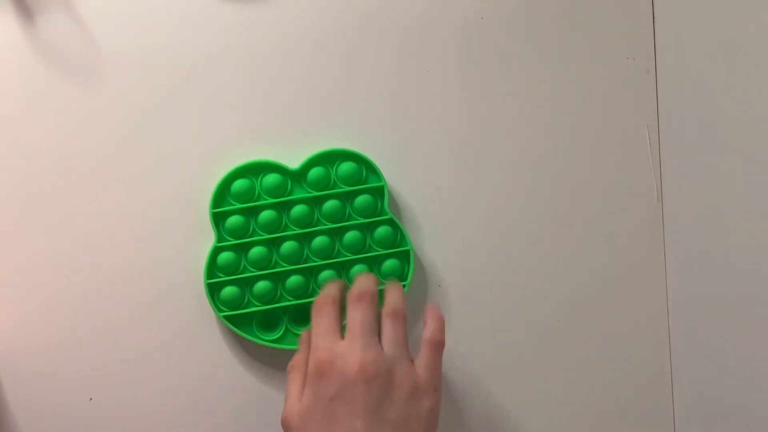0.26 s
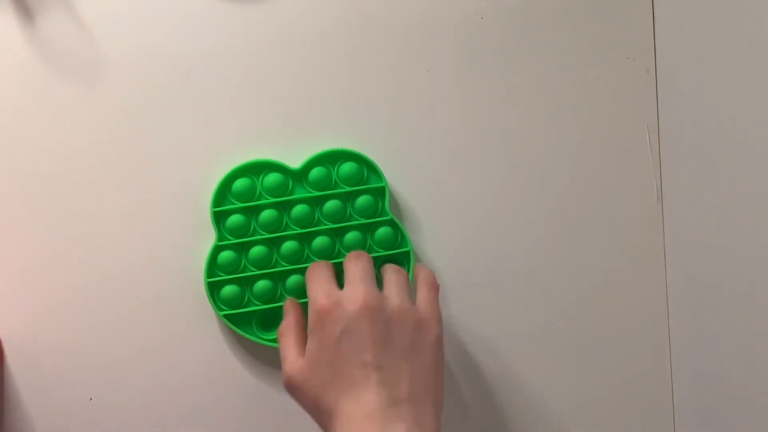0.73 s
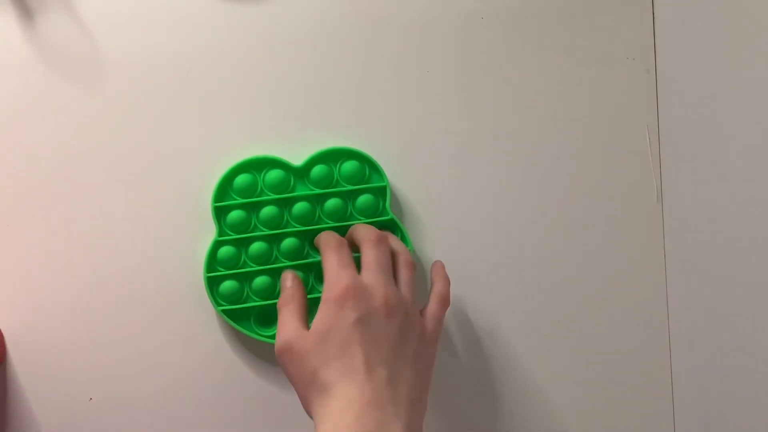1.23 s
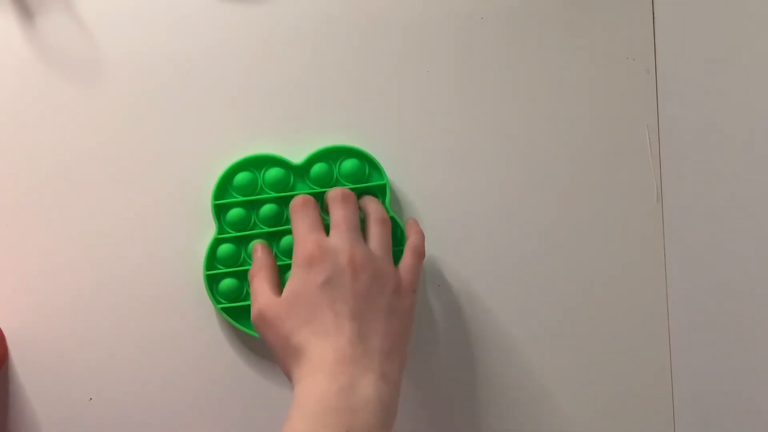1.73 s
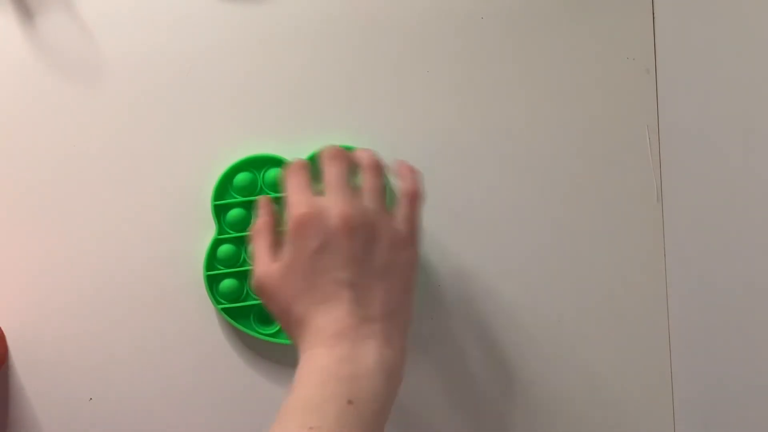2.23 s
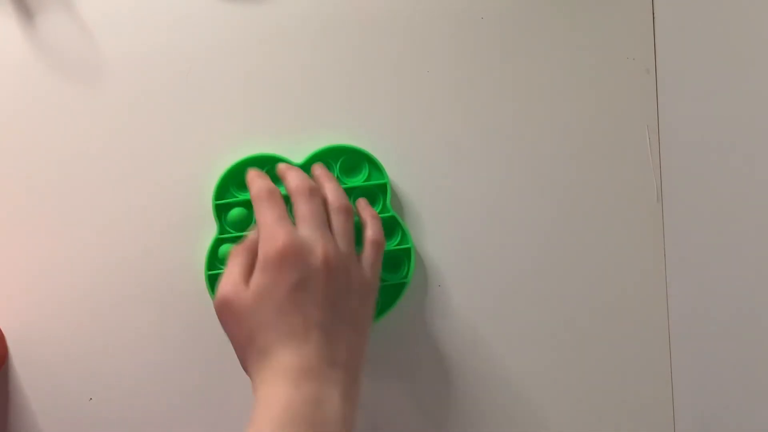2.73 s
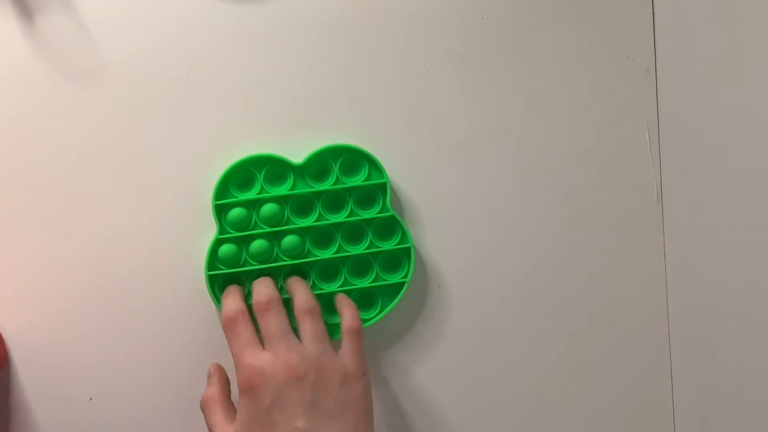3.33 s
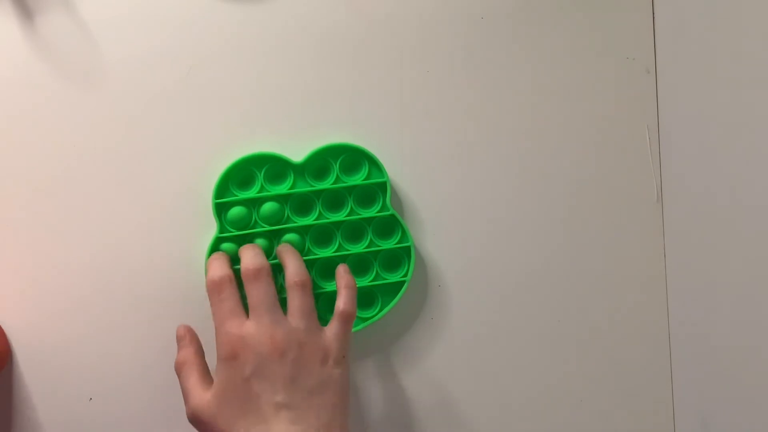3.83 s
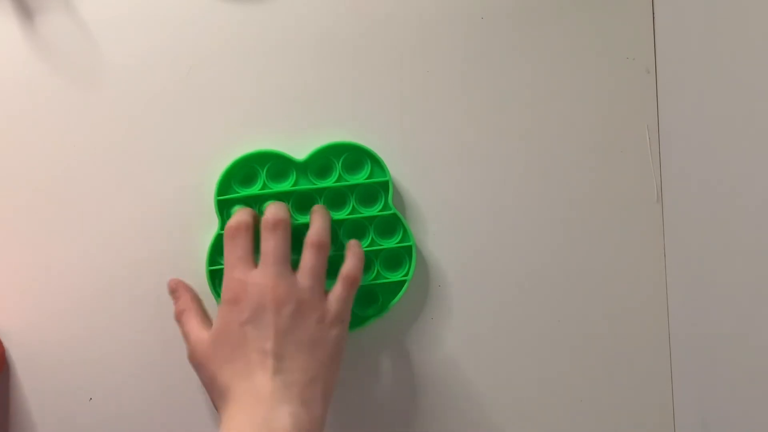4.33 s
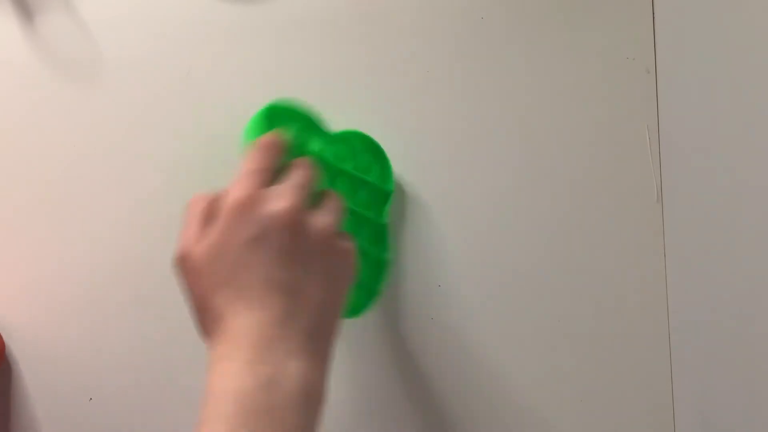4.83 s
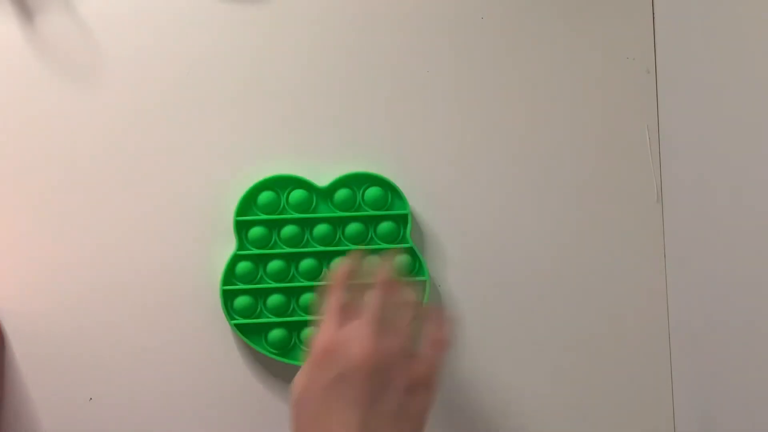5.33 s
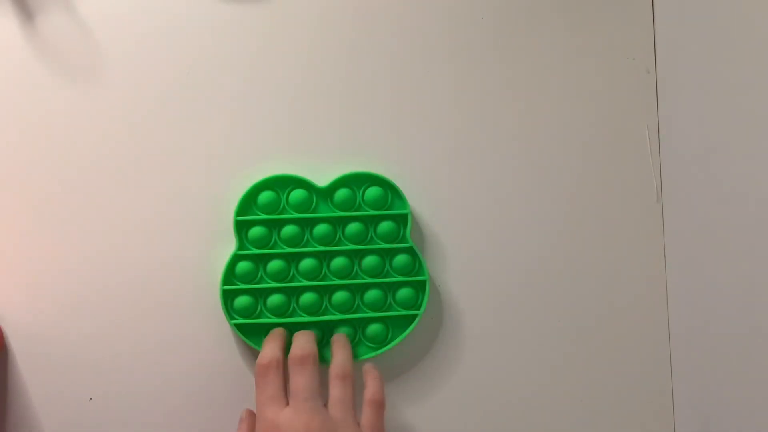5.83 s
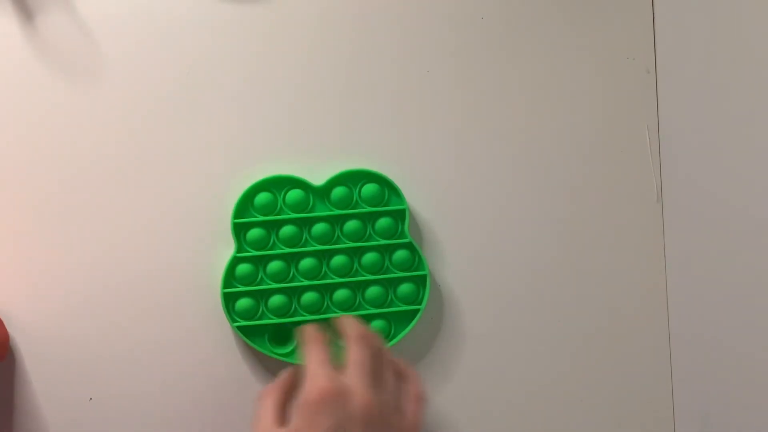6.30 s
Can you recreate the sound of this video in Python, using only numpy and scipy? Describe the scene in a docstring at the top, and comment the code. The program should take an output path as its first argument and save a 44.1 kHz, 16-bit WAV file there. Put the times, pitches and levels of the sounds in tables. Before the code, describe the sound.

Fingers pop the bubbles of a silicone fidget toy on a thin table, each pop a sharp snap with a hollow knock from the board. The first comes at about 0.1 seconds, followed by quick clusters of two or three near 0.6, 1.2, 1.7, 2.1 and 2.6 seconds. After a short gap, tight double pops sound at about 3.4, 4.0 and 4.5 seconds. Soft fingertip taps and faint rubbing of skin on silicone lie between them. Around 4.9 seconds the toy drags across the table with a brief stuttering groan, then lands at about 5.3 seconds with a floppy slap and a short brushing hiss. Only light taps and faint rubs follow, until about 6.5 seconds. The microphone is close above the table in a small quiet room with little echo and a very faint steady background rumble.

```python
"""Sharp pops and hollow knocks: fingers pop the domes of a silicone bubble toy on a thin table top,
then drag it up, flip it and slap it down. Each dome snaps in the air and knocks the board, whose
bending waves arrive treble first, bass last. Skin rubs on silicone between presses.
A small quiet room, a phone microphone above the table."""
import sys
import numpy as np
from scipy import signal
from scipy.fft import rfft, irfft
from scipy.io import wavfile
from scipy.ndimage import uniform_filter1d

SR = 44100
rng = np.random.default_rng(int(sys.argv[2]) if len(sys.argv) > 2 else 0)


def unload_wav(signal):
    """Save mono or channel-first audio to the path in sys.argv[1] as 16-bit WAV at rate SR, clipped to [-1, 1]."""
    wavfile.write(
        sys.argv[1],
        SR,
        np.round(np.clip(np.atleast_2d(signal).T, -1, 1) * 32767).astype(np.int16),
    )


N = 289296

# Domes flipping. Each row: time in seconds, snap in dB, cavity in Hz, air puff in dB,
# board knock in dB, board bass in dB, mode under the dome in Hz.
POPS = [(0.102, -15, 1810, -15.5, -15, -23, 690), (0.239, -31, 1850, -54, -23.5, -33, 730),
        (0.6216, -20, 1850, -57.5, -19.5, -30, 896), (0.633, -14, 1830, -37.5, -18, -14, 895),
        (0.6519, -14, 4870, -12, -14, -23, 713), (1.118, -14.5, 1780, -26, -13, -25, 716),
        (1.172, -15.5, 4120, -13, -10, -22, 650), (1.26, -20, 2210, -25, -15, -17.5, 710),
        (1.6473, -13, 2907, -49.5, -18.5, -34, 396), (1.654, -11, 3680, -40.5, -14.5, -27, 720),
        (1.7032, -12, 3790, -13, -15, -24, 710), (2.121, -18.5, 1595, -31, -25, -16.5, 1150),
        (2.125, -9.5, 1760, -47.5, -15, -19, 270), (2.537, -13, 1490, -23, -19, -21, 1032),
        (2.619, -15, 1430, -29, -22.5, -26, 690), (3.3782, -18.5, 2750, -28, -13.5, -23.5, 700),
        (3.4015, -9, 2120, -30, -13.5, -24, 704), (3.9913, -14.5, 1593, -17.5, -23, -35.5, 1146),
        (3.998, -15, 4880, -21.5, -13.5, -13, 1150), (4.544, -13.5, 2390, -22, -18, -32, 332),
        (4.555, -11.5, 1574, -25.5, -16, -17, 707)]
# Fingers and toy landing. Each row: time in seconds, tick in dB, board knock in dB,
# board bass in dB, mode under the contact in Hz.
TAPS = [(0.05, -74, -47, -42.5, 270), (0.385, -63, -44, -77.5, 910), (0.394, -60, -32.5, -42.5, 700),
        (0.644, -49, -19.5, -23, 710), (0.819, -52, -71, -57.5, 710), (0.969, -54.5, -30, -33, 890),
        (0.977, -62.5, -28.5, -33.5, 330), (0.988, -54, -34.5, -37.5, 400),
        (1.366, -60.5, -46.5, -49.5, 274), (1.542, -43, -25.5, -40, 690), (1.877, -55.5, -70, -65, 294),
        (2.019, -60.5, -35.5, -44, 400), (2.132, -40.5, -14, -10, 270), (2.249, -50.5, -38, -52.5, 740),
        (2.265, -57, -40.5, -70.5, 407), (2.466, -40.5, -23, -37, 690), (2.766, -65.5, -51, -69, 270),
        (2.828, -64.5, -50, -66.5, 320), (3.015, -59.5, -46, -54.5, 392), (3.027, -61, -31, -38, 710),
        (3.176, -72.5, -54, -60, 710), (3.262, -66.5, -28.5, -36.5, 710), (3.565, -74, -51, -57, 270),
        (3.675, -62.5, -28, -41.5, 900), (4.301, -56.5, -34, -32.5, 336), (4.502, -63, -57, -40.5, 340),
        (4.701, -73, -59, -73, 321), (4.805, -51.5, -36, -61, 297), (4.814, -56.5, -43.5, -55, 400),
        (4.863, -56, -28.5, -30.5, 357), (4.983, -54.5, -51, -35, 720), (5.16, -41, -23, -28.5, 299),
        (5.18, -49, -31, -34.5, 270), (5.218, -45.5, -22.5, -23.5, 366), (5.251, -54, -25.5, -29.5, 900),
        (5.259, -28, -18.5, -37.5, 397), (5.27, -19.5, -11.5, -15, 405), (5.288, -24, -16, -23.5, 930),
        (5.306, -28, -16.5, -24, 1500), (5.32, -36, -16.5, -32, 930), (5.544, -69.5, -44.5, -48.5, 410),
        (5.553, -64, -41.5, -44, 400), (5.692, -57, -80, -84, 402), (5.752, -50, -66.5, -71, 1500),
        (6.021, -60, -37.5, -26, 720), (6.042, -63.5, -30.5, -32, 710), (6.053, -65.5, -49, -37, 710),
        (6.325, -47.5, -38.5, -42, 398), (6.488, -56.5, -34.5, -42, 660), (6.525, -68.5, -49, -46, 270)]
# Toy dragged over the board. Each row: time in seconds, board drive in dB, rim chatter in dB.
DRAG = [(4.854, -46.5, -68), (4.864, -22.5, -45), (4.89, -15, -43), (4.962, -29.5, -54.5),
        (5.02, -67, -75.5)]
# Spectra of rub and tick as coloured by the microphone.
# Each row: frequency in Hz, relative density in dB.
RUB_SPECTRUM = [(880, -48), (1500, -12.5), (2060, -15.5), (2390, -5.5), (2770, -19), (3180, -5.5),
                (4330, -7.5), (5170, -12), (5600, -12), (7170, -9), (8300, -3.5), (10000, -9.5),
                (11500, -22), (16000, -37)]
TICK_SPECTRUM = [(1500, -1.5), (2500, -0.5), (4500, -2), (6600, -12.5), (8300, -9.5), (11000, -27.5),
                 (16000, -43)]


def from_db(db):
    return 10 ** (np.asarray(db) / 20)


def at_hz(points, hz):
    """Interpolate (Hz, value) rows over log frequency."""
    points = np.array(points)
    return np.interp(np.log(hz + 1), np.log(points[:, 0]), points[:, 1])


def coloured(spectrum, size):
    """Noise of a given spectrum, rms 1."""
    hz = np.fft.rfftfreq(size, 1 / SR)
    x = irfft(rfft(rng.standard_normal(size)) * from_db(at_hz(spectrum, hz)), size)
    return x / np.std(x)


def burst(spectrum, t60_s, rise_s=.0021):
    """Noise that swells fast and dies."""
    t = np.arange(2048) / SR
    return coloured(spectrum, len(t)) * np.clip(t / rise_s, 0, 1) * from_db(-60 * t / t60_s)


def ring(force, hz, t60_s):
    """One mode: a unit click starts a decaying sine of height 1."""
    r, w = from_db(-60 / (t60_s * SR)), 2 * np.pi * hz / SR
    return signal.lfilter([0, np.sin(w)], [1, -2 * r * np.cos(w), r * r], force + 1e-18)


def butter(x, order, hz, kind="low"):
    return signal.sosfilt(signal.butter(order, hz, kind, fs=SR, output="sos"), x)


def add(out, start_s, sound, peak_db):
    at = round(start_s * SR)
    out[at:at + len(sound)] += (from_db(peak_db) * sound / np.abs(sound).max())[:N - at]


def slips(per_s, spread_db=3):
    """Stick and slip: uneven random clicks, rms 1."""
    clicks = (rng.random(N) < per_s / SR) * rng.choice([-1, 1], N)
    clicks = clicks * from_db(spread_db * rng.standard_normal(N))
    return clicks / np.std(clicks)


def drag_gain(column):
    """Envelope from one dB column of DRAG, silent outside the drag."""
    rows = np.array(DRAG)
    return from_db(np.interp(np.arange(N) / SR, rows[:, 0], rows[:, column], left=-200, right=-200))


def pad_treble_db(knock_db):
    """Treble drive of a finger pad: the softer the landing, the duller."""
    return knock_db - 3 + .38 * np.minimum(knock_db + 20, 0)


def dome_snaps(swell_s=.03, cavity_cycles=16):
    """A dome whips through, rings its cavity and puffs out air; a faint hiss swells just before."""
    # Puff spectrum as coloured by the microphone. Each row: frequency in Hz, relative density in dB.
    puff_spectrum = [(3000, -29.5), (5000, -2.5), (6700, -11.5), (8400, 0.5), (10000, -6), (11500, -20),
                     (16000, -33.5)]
    swell = np.linspace(0, 1, int(swell_s * SR)) ** 2
    out = np.zeros(N)
    for start_s, snap_db, cavity_hz, puff_db, *_ in POPS:
        hiss = swell * coloured(RUB_SPECTRUM, 2048)[:len(swell)]
        add(out, start_s - swell_s, hiss, snap_db - 36.5)
        cavity = ring(burst(TICK_SPECTRUM, t60_s=.008), cavity_hz, t60_s=cavity_cycles / cavity_hz)
        add(out, start_s, cavity, snap_db - 2)
        add(out, start_s, burst(TICK_SPECTRUM, t60_s=.027), snap_db - 3)
        add(out, start_s, burst(puff_spectrum, t60_s=.0058), puff_db)
    return out


def soft_taps(octaves_per_db=.2, tick_share=.67):
    """Fingers and toy land with a tick and a scuff; harder ticks reach higher."""
    # Scuff spectrum. Each row: frequency in Hz, relative density in dB.
    scuff_spectrum = [(600, -9.5), (1200, -3), (1900, 3), (2700, -8.5), (3500, -22.5), (6000, -35),
                      (16000, -53.5)]
    out = np.zeros(N)
    for start_s, tick_db, knock_db, *_ in TAPS:
        edge_hz = min(3480 * 2 ** (octaves_per_db * (tick_db + 60.5)), .45 * SR)
        add(out, start_s, butter(burst(TICK_SPECTRUM, t60_s=.027), 2, edge_hz), tick_db)
        scuff_db = tick_share * tick_db + (1 - tick_share) * pad_treble_db(knock_db) - .5
        add(out, start_s, burst(scuff_spectrum, t60_s=.024), scuff_db)
    return out


def board_knocks(middle_from_hz=220, treble_from_hz=620, pad_contact_hz=2200, pad_db_per_octave=-3.5):
    """Every blow strikes all modes of the table top; the dragged toy makes it groan."""
    # Table top modes. Each row: frequency in Hz, gain in dB, t60 in seconds before the damping cap.
    modes = [(98, -8.5, 0.11), (128.7, 1.5, 0.13), (170, -6.5, 0.11), (270, -0.5, 0.028), (333, -1, 0.24),
             (396.6, -1, 0.1), (516.5, -7, 0.066), (567, -11.5, 0.081), (707, -7.5, 0.099), (771, -6, 0.03),
             (900, -3.5, 0.05), (1012, -7, 0.061), (1150, -6, 0.042), (1336, -8.5, 0.092),
             (1490, -12.5, 0.12), (1677, -11, 0.11), (1850, -13.5, 0.09), (2300, -18.5, 0.075),
             (2840, -23.5, .02)]
    blows = np.array([(row[0], *row[-3:]) for row in POPS + TAPS])
    start_s, knock_db, bass_db, spot_hz = blows.T
    padded = np.arange(len(blows)) >= len(POPS)
    treble_db = np.where(padded, pad_treble_db(knock_db), knock_db - 1)
    # silicone lands in four touches, the first strongest
    later_s = np.cumsum(rng.uniform(.002, .008, (len(blows), 3)), axis=1)
    touch_s = start_s[:, None] + np.insert(later_s, 0, 0, axis=1)
    at = np.round(touch_s * SR).astype(int).clip(0, N - 1)
    touch_db = np.where(padded[:, None], [0, -7, -11, -8], [-.5, -9, -10.5, -13.5])
    scatter_db = rng.normal(0, 2.5, (len(blows), len(modes), 4))
    groan = drag_gain(column=1) * butter(slips(per_s=1600), 2, [270, 430], "band") * from_db(-28)
    out = np.zeros(N)
    for k, (hz, gain_db, t60_s) in enumerate(modes):
        is_bass, is_middle = hz < middle_from_hz, middle_from_hz <= hz < treble_from_hz
        drive_db = bass_db if is_bass else knock_db if is_middle else treble_db
        # lift of the modes that move most under the struck spot
        spot_db = 7.5 * np.exp(-(np.log2(hz / spot_hz) / .14) ** 2)
        dull_db = padded * pad_db_per_octave * max(np.log2(hz / 800), 0)
        blow_db = drive_db + spot_db + dull_db - 3
        strength = from_db(blow_db[:, None] + touch_db + scatter_db[:, k])
        if is_bass:
            strength[:, 1:] = 0   # slow modes feel one push
        force, pad_force = groan * is_middle, np.zeros(N)
        np.add.at(force, at[~padded], strength[~padded])
        np.add.at(pad_force, at[padded], strength[padded])
        force += butter(pad_force + 1e-18, 2, pad_contact_hz)   # a padded landing lasts longer
        # hand and silicone damp the middle modes; elsewhere wood rings 45 cycles at most
        cap_s = .055 if is_middle else 45 / hz
        out += (-1) ** k * from_db(gain_db) * ring(force, hz, min(t60_s, cap_s))
    return bending_waves(out)


def bending_waves(x, lag_at_1khz_s=.003, air_lag_s=.003, contact_hz=3500):
    """Wave speed grows as the root of frequency; timing is relative to the airborne snap."""
    hz = np.fft.rfftfreq(2 * N, 1 / SR)
    phase_turns = 2 * lag_at_1khz_s * np.sqrt(1e3 * hz) - air_lag_s * hz
    contact = 1 / (1 + (hz / contact_hz) ** 4)   # soft contact cuts the treble
    return irfft(rfft(x, 2 * N) * contact * np.exp(-2j * np.pi * phase_turns))[:N]


def skin_rub(fall_db_per_s=501, scrape_hz=10500, grip_db=1.2):
    """Skin hisses over silicone with uneven grip; hard slides gain a bright edge."""
    # Slides. Each row: swell end in seconds, fade start in seconds, level in dB, swell in dB per second.
    slides = [(0.106, 0.074, -93, 893), (0.445, 0.6, -80.5, 450), (0.8, 0.841, -68.5, 298),
              (1.402, 1.402, -66, 501), (1.547, 1.62, -76, 596), (1.875, 1.888, -70.5, 303.5),
              (2.255, 2.254, -66, 900), (2.751, 2.964, -71, 498), (3.018, 3.022, -76, 599.5),
              (3.165, 3.172, -82, 449), (3.47, 3.494, -68.5, 446), (3.52, 3.523, -59.5, 402.5),
              (3.686, 3.752, -71.5, 1497.5), (3.967, 3.982, -68.5, 600.5), (4.146, 4.18, -80, 449.5),
              (5.141, 5.155, -66.5, 501), (5.161, 5.165, -52, 2498), (5.219, 5.24, -48, 2500),
              (5.248, 5.263, -41, 495), (5.326, 5.498, -61, 448), (5.5, 5.55, -70, 450),
              (5.705, 5.713, -66.5, 450), (6.098, 6.112, -80, 199.5), (6.316, 6.338, -59.5, 1202)]
    t = np.arange(N) / SR
    slides_db = [db - swell * np.maximum(full_s - t, 0) - fall_db_per_s * np.maximum(t - fade_s, 0)
                 for full_s, fade_s, db, swell in slides]
    envelope = from_db(np.max(slides_db, axis=0))
    scrape = butter(rng.standard_normal(N), 2, scrape_hz, "high")
    scrape *= from_db(-10) * (envelope / from_db(-45)) ** .6
    hiss = envelope * (coloured(RUB_SPECTRUM, N) + scrape)
    grip = uniform_filter1d(rng.standard_normal(N), size=300)
    return hiss * from_db(grip_db * grip / np.std(grip))


def rim_chatter(stutter_hz=125):
    """The dragged rim catches and slips in a quick stutter."""
    # Silicone rim modes. Each row: frequency in Hz, relative gain in dB, t60 in seconds.
    modes = [(1390, 7.5, 0.0013), (1920, -10.5, 0.014), (2340, -16, 0.0057), (3420, -21, .004),
             (5340, -10.5, 0.00063), (8500, -11, 0.001)]
    phase_turns = np.arange(N) / SR * stutter_hz + np.cumsum(rng.normal(0, .02, N))
    stutter = .6 + (phase_turns % 1 < .4)
    catches = stutter * slips(per_s=4000)
    chatter = sum(from_db(db) * ring(catches, hz, t60_s) for hz, db, t60_s in modes)
    chatter = butter(chatter, 4, 9000)   # rubber catches softly
    return drag_gain(column=2) * chatter / np.std(chatter)


def room_tail(onset_s=.002):
    """Diffuse tail: overlapping third-octave noise bands, each dying at its own pace."""
    # Room decay. Each row: frequency in Hz, t60 in seconds.
    decay = [(100, 0.56), (450, 0.32), (800, 0.23), (1500, 0.17), (4000, .18), (7000, .17), (10000, 0.05),
             (16000, .11)]
    # Reverberation level. Each row: frequency in Hz, gain in dB.
    levels = [(100, -25.5), (500, -20), (1500, -10), (4000, -11.5), (10000, -8.5), (16000, -11)]
    t, out = np.arange(SR // 3) / SR, 0
    thirds = 3 * np.log2(np.fft.rfftfreq(len(t), 1 / SR) + 1)
    for third in range(18, 43):
        hz = 2 ** (third / 3)
        share = np.sqrt(np.clip(1 - np.abs(thirds - third), 0, 1))   # neighbours sum to even power
        band = irfft(share * rfft(rng.standard_normal(len(t))), len(t))
        fade = from_db(-60 * t / at_hz(decay, hz))
        out += from_db(at_hz(levels, hz)) * band * fade / np.sqrt(np.sum(fade ** 2))
    return out * np.clip(t / onset_s, 0, 1)


def room(x, tails=3, crossfades_per_s=30):
    """Several noise tails crossfade quickly so the room decay stays smooth."""
    turn = np.arange(N) / SR * crossfades_per_s
    out = np.zeros(N)
    for k in range(tails):
        apart = np.abs((turn - k + tails / 2) % tails - tails / 2)
        out += np.sqrt(np.clip(1 - apart, 0, 1)) * signal.fftconvolve(x, room_tail())[:N]
    return out


def noise_floor(rms_db=-71.5):
    """Faint steady rumble and hiss."""
    # Background spectrum. Each row: frequency in Hz, relative density in dB.
    spectrum = [(29, -40), (50, -11.5), (117, 3), (199, -10), (383, -11.5), (592, -20), (718, -14),
                (792, -22), (2040, -30.5), (2410, -30), (5910, -30), (8510, -28), (11900, -33.5),
                (14500, -37), (16400, -54)]
    return from_db(rms_db) * coloured(spectrum, N)


def scene(echo_s=.0036, echo_db=-14.5):
    """Mono mix; snaps and taps bounce once between phone and table."""
    airborne = dome_snaps() + soft_taps()
    knocks = board_knocks()
    echo = from_db(echo_db) * np.interp(np.arange(N) - echo_s * SR, np.arange(N), airborne)
    floor = noise_floor()
    reverb = room(airborne + knocks)
    return (airborne + echo + knocks + reverb + skin_rub() + rim_chatter() + floor)[None, :]


def record(dry):
    """The small microphone loses the deep bass and rings at its inlet; the top is cut."""
    low_hz, stop_hz = 77, 16700
    inlet_hz, inlet_width_hz, inlet_db = 8410, 60, -3
    thin = butter(dry, 4, low_hz, "high")
    inlet = signal.lfilter(*signal.iirpeak(inlet_hz, inlet_hz / inlet_width_hz, fs=SR), thin)
    top_cut = signal.cheby2(12, 70, stop_hz, fs=SR, output="sos")
    return signal.sosfilt(top_cut, thin + from_db(inlet_db) * inlet)


dry = scene()
out = record(dry)
unload_wav(out)
```